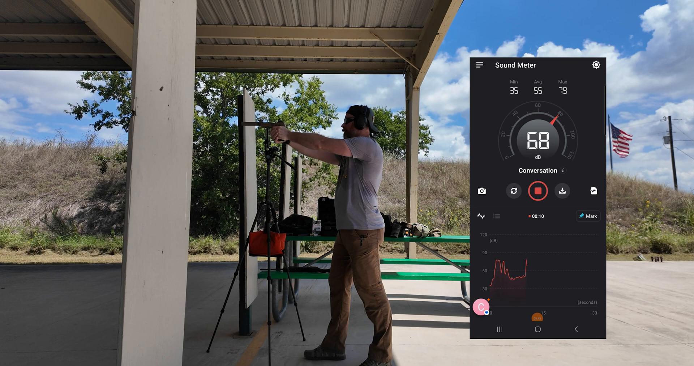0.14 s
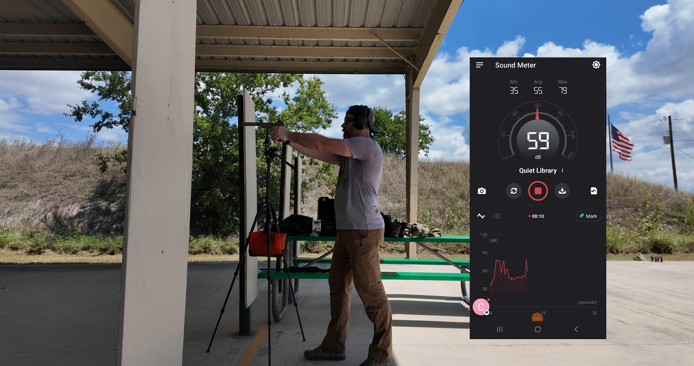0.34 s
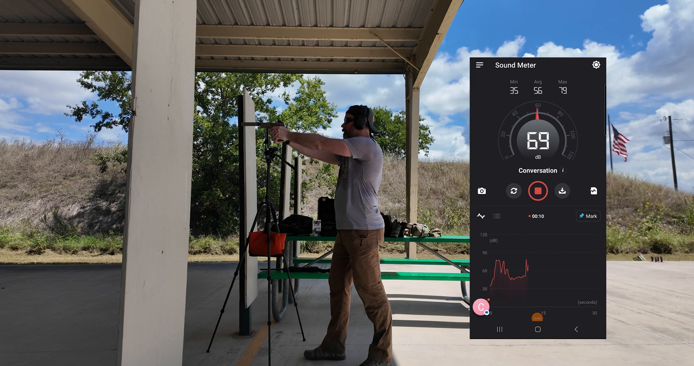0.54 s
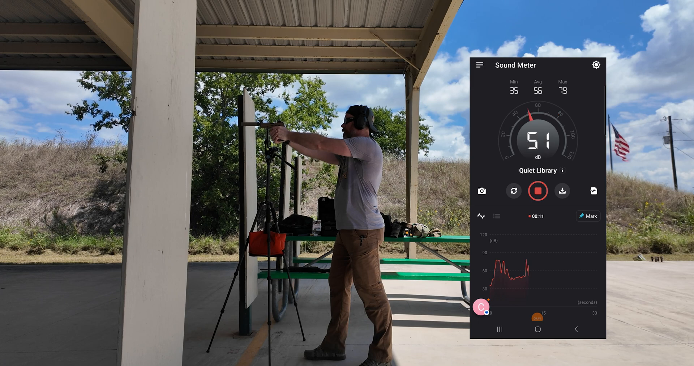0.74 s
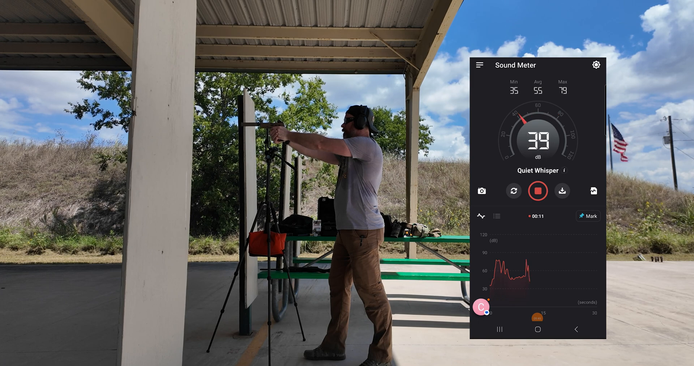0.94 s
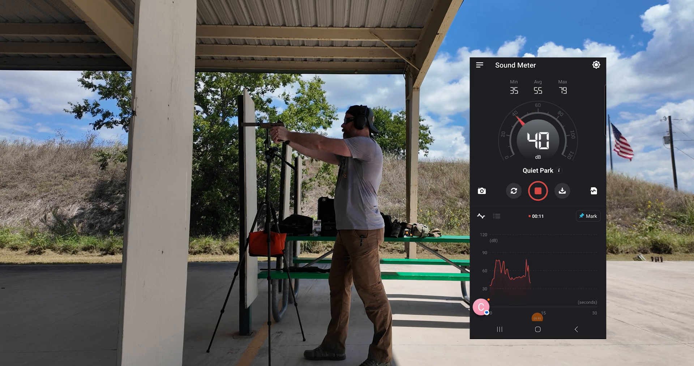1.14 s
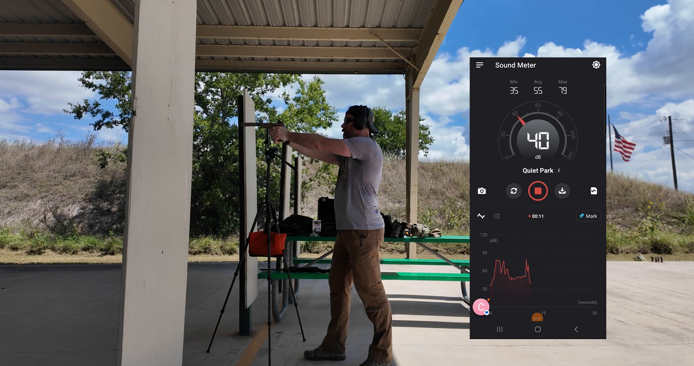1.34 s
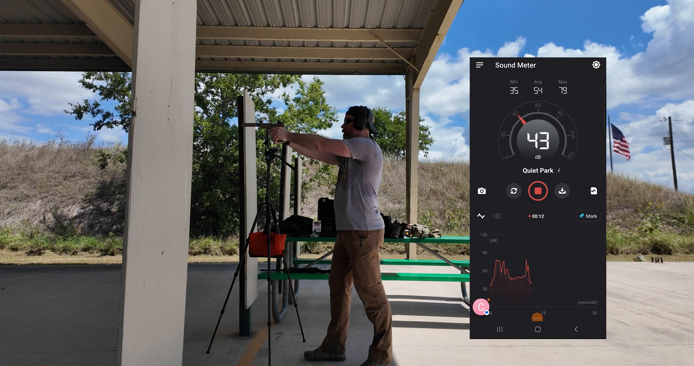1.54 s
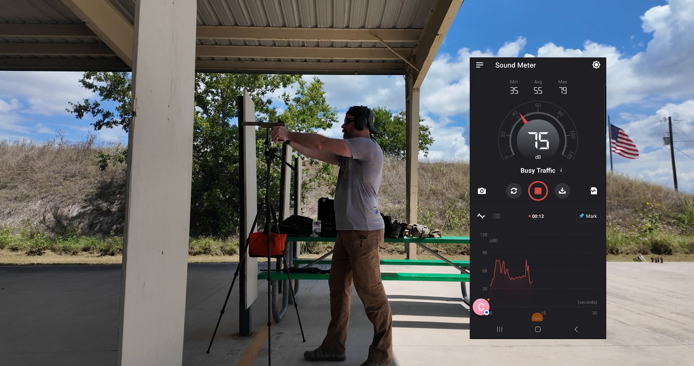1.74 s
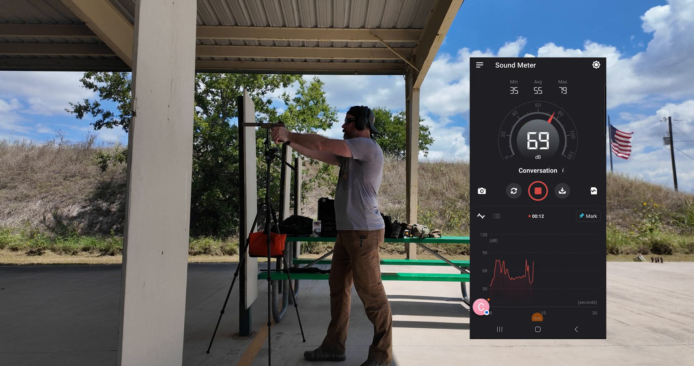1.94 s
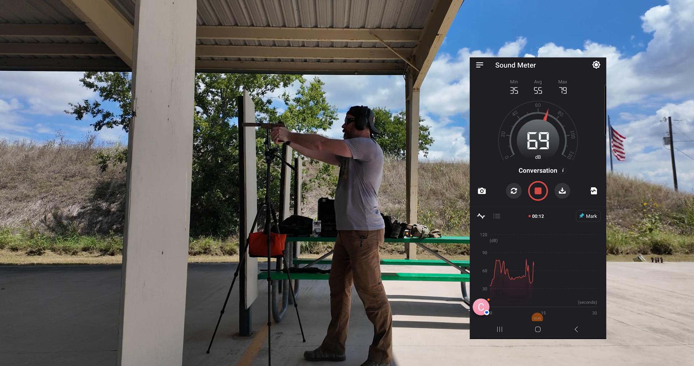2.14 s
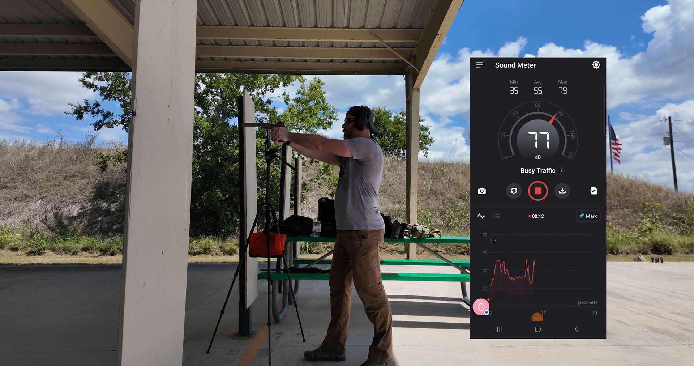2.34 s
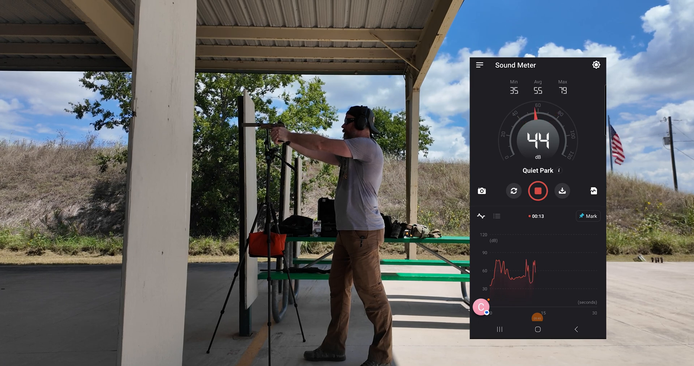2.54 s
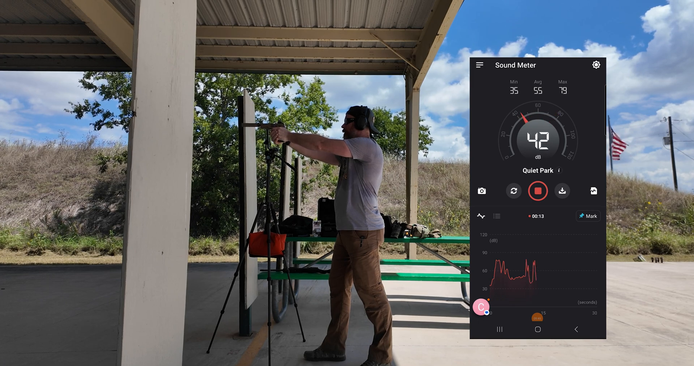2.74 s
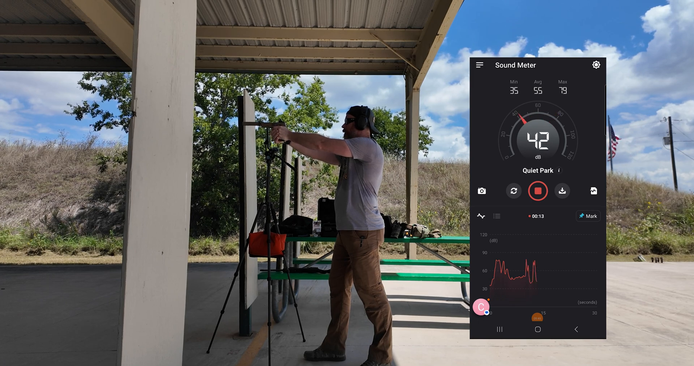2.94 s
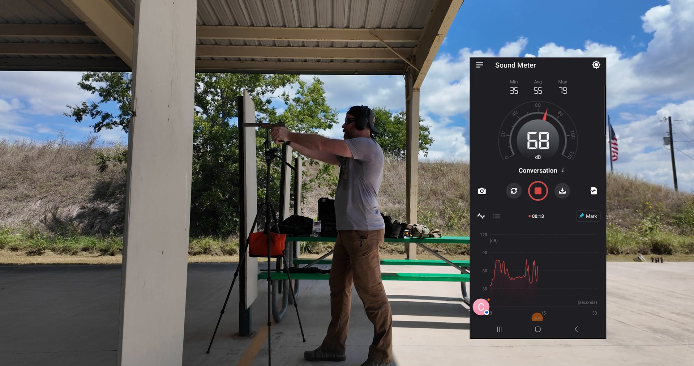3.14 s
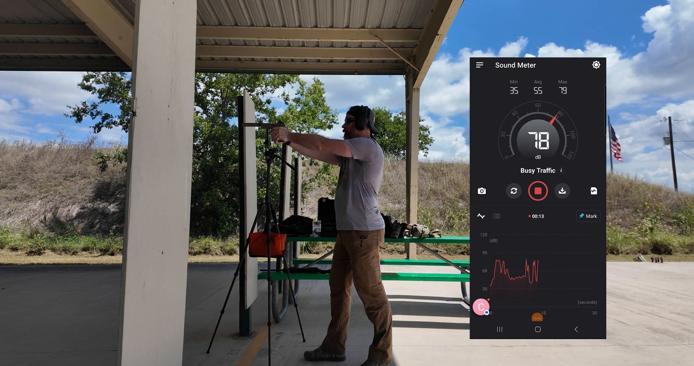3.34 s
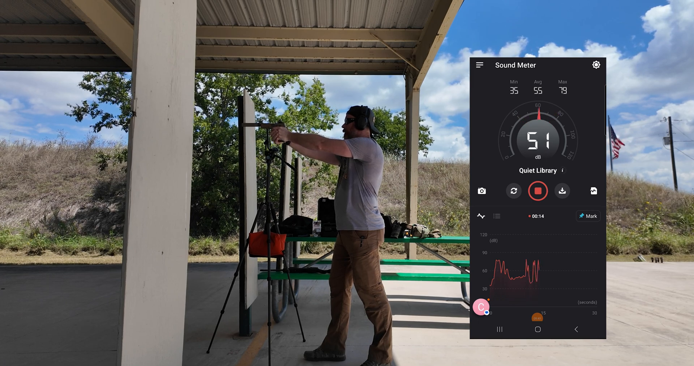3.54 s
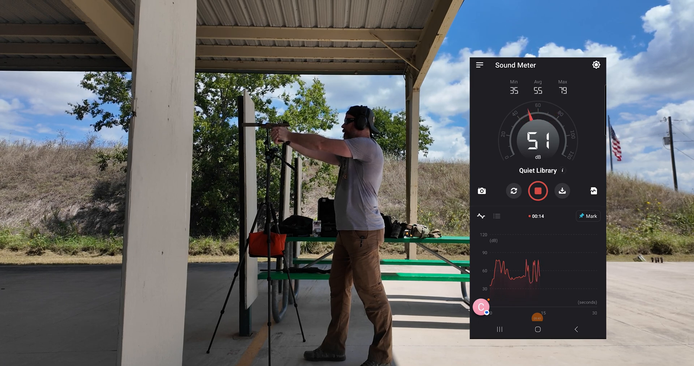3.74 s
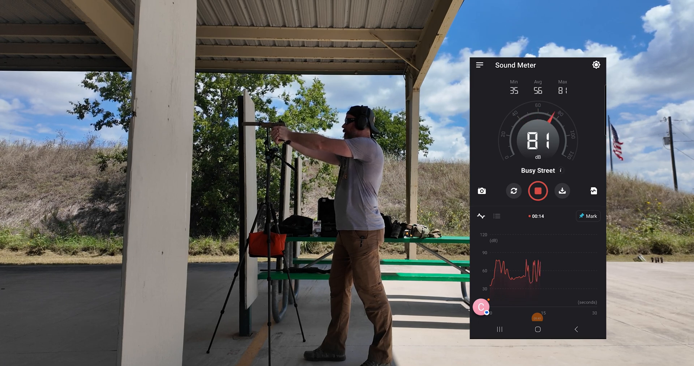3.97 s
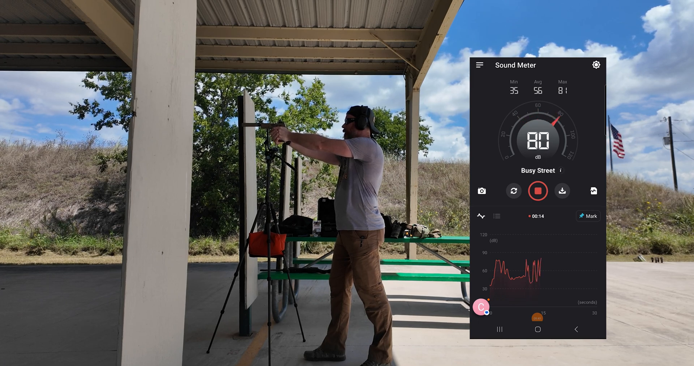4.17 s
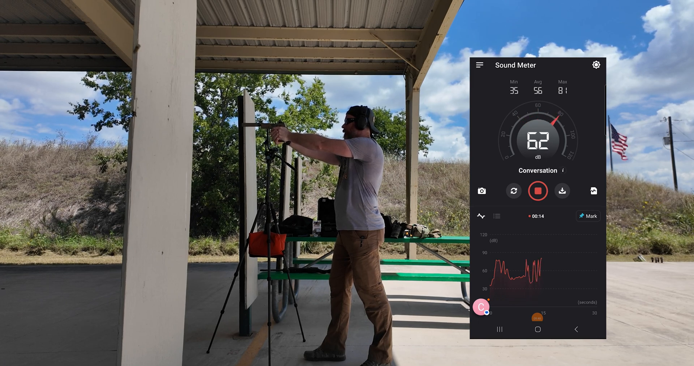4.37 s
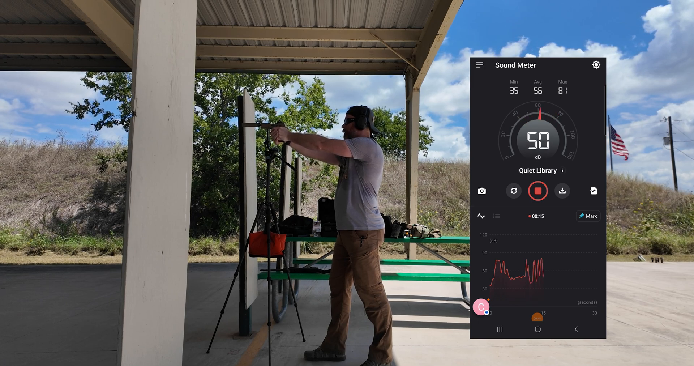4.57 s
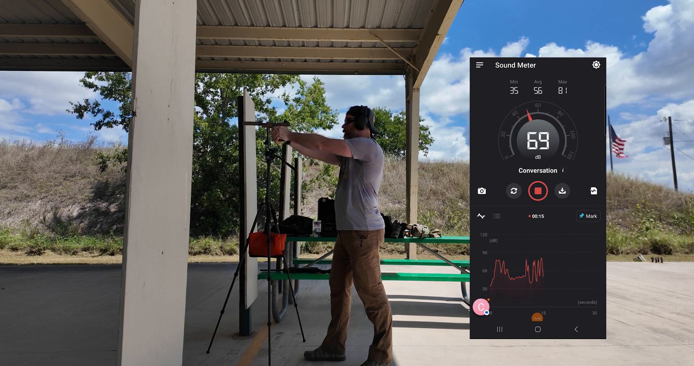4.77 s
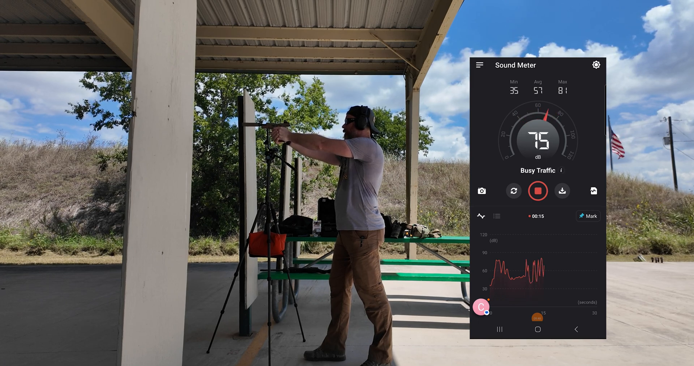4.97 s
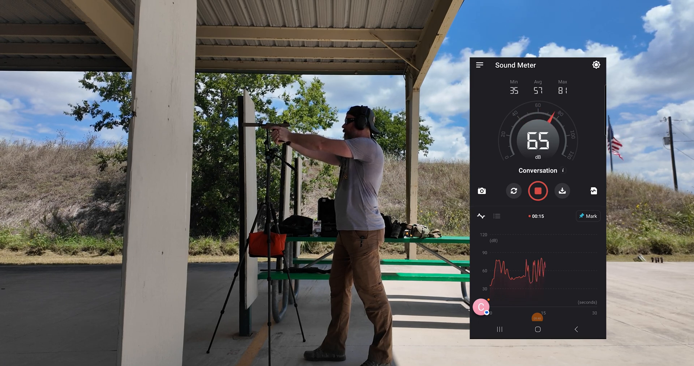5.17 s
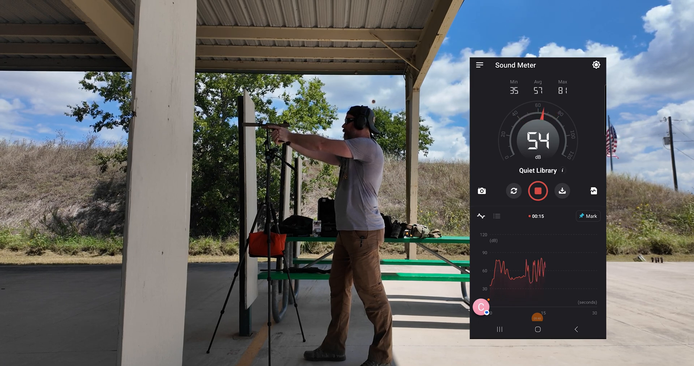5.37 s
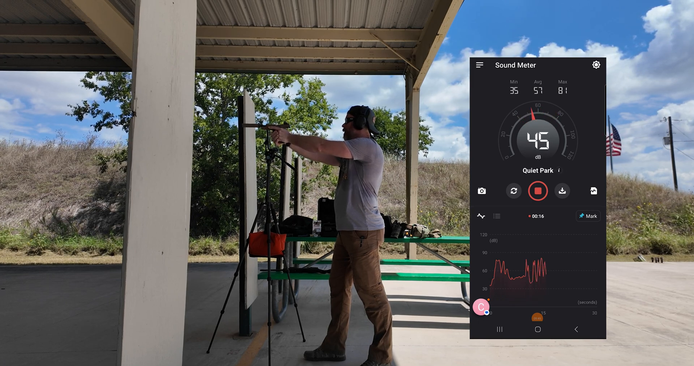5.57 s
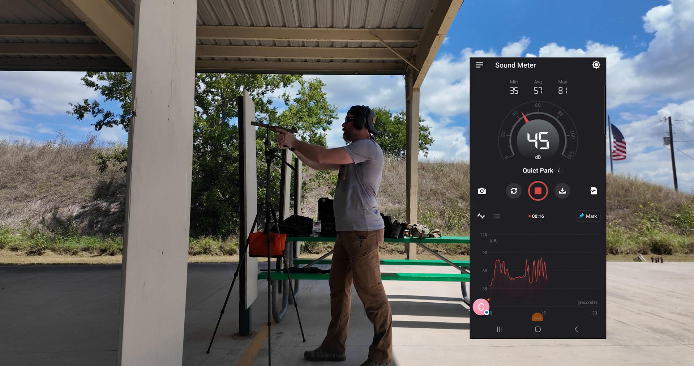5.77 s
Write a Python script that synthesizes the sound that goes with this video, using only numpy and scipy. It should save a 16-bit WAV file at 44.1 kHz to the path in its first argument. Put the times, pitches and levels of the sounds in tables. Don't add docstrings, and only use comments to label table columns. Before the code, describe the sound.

A roofed outdoor range, heard close with a gain control that ducks and recovers. From 0 s the diffuse wash of an earlier shot swells and dies; a spent case knocks hard and dry on a bench at 0.37 s, and faint brass ticks follow until 1.5 s. Suppressed small-pistol shots come at 1.73, 2.87, 3.85 and 4.76 s: a tiny trigger click, a short muzzle pop with gas spit, and rapid steel slide clacks, with little bass. About 0.15 s later a crisp clustered echo returns from the bank, then scattered wash blooms and fades with a faint roof ring. The middle two have sharper gas; the last locks open with a louder echo. Cases knock at 2.11, 3.23 and 4.12 s, the third higher, with thin pings and a faint skid on concrete. Soft wind, far traffic and a low drone lie beneath. At 5.66 s sheet metal clangs brightly, ringing to the end.

```python
import sys
import numpy as np
from scipy import signal
from scipy.fft import rfft, irfft
from scipy.io import wavfile
from scipy.ndimage import uniform_filter1d

SR = 44100
rng = np.random.default_rng(int(sys.argv[2]) if len(sys.argv) > 2 else 0)


def volts(x):
    e = np.asarray(x, float) / 20
    return 10 ** e


def generate_wav(signal):
    frames = np.transpose(np.atleast_2d(signal))
    scaled = np.clip(frames, -1, 1) * 32767
    pcm = np.round(scaled).astype(np.int16)
    wavfile.write(sys.argv[1], SR, pcm)


N = 255912
T = np.arange(N) / SR

# time in seconds, muzzle thump in dB, wash in dB, gain cut in dB.
SHOTS = [
    (-.3, -12, -7, 40),
    (1.7255, -11, -8, 40),
    (2.8742, -11, -8, 40),
    (3.8495, -11, -8, 40),
    (4.7557, -10, -7.5, 36),
]
# trigger lead in seconds, gas jet in dB, case ejection in dB,
# echo delay in seconds, echo in dB.
ROUNDS = [
    (.0333, -10, -20, .1476, -10),
    (.0254, -4, -17, .1454, -12),
    (.028, -3, -14, .1474, -10),
    (.0197, -11, -24, .151, -7),
]
# time in seconds, level in dB, rise in seconds, t60 in seconds.
CLANG = (5.6645, -18, .003, .7)


def unit(x):
    return x / np.sqrt(np.mean(x ** 2) + 1e-20)


def along(points, hz):
    f, v = np.transpose(points)
    return np.interp(np.log(hz + 1), np.log(f + 1), v)


def causal(x, spectrum):
    gain = volts(along(spectrum, np.fft.rfftfreq(8192, 1 / SR)))
    cepstrum = irfft(np.log(gain + 1e-5))
    cepstrum[1:4096] *= 2
    cepstrum[4097:] = 0
    impulse = irfft(np.exp(rfft(cepstrum)))
    return signal.fftconvolve(x, impulse)[:len(x)]


def patchy(level_db, patchy_db):
    hz, t, z = signal.stft(rng.standard_normal(N), SR, nperseg=512)
    field = uniform_filter1d(rng.standard_normal(z.shape), size=6, axis=0)
    field = uniform_filter1d(field, size=6, axis=1)
    gain = volts(level_db(hz[:, None], t) + patchy_db * unit(field))
    return signal.istft(z * gain, SR, nperseg=512)[1][:N]


def ring(modes, t, spread_db, attack):
    hz, db, t60 = np.transpose(modes)[..., None]
    luck = rng.standard_normal((2, len(modes), 1))
    sign = (-1) ** np.arange(len(modes))[:, None]
    decay = volts(db + spread_db * luck[0] - 60 * t / t60)
    detune = 1 + .008 * spread_db * luck[1]
    modes_sum = np.sum(sign * decay * np.sin(2 * np.pi * hz * detune * t), 0)
    return modes_sum * (1 - np.exp(-t / attack))


def add(track, s, sound):
    part = track[round(s * SR):][:len(sound)]
    part += sound[:len(part)]


def room(x, t60, wet_db):
    t = np.arange(SR // 4) / SR
    tail = rng.standard_normal(len(t)) * volts(-60 * t / t60) * (1 - np.exp(-t / .006))
    tail /= np.linalg.norm(tail)
    return x + volts(wet_db) * signal.fftconvolve(x, tail)[:N]


def air():
    # frequency in Hz, density in dB per Hz.
    breeze = [(20, -32), (50, -12), (80, -4), (120, -1), (180, -5), (250, -2), (500, -3), (790, -4),
              (1000, -9), (1600, -15), (3200, -16), (4200, -22), (5500, -22), (8000, -27), (12600, -34),
              (13200, -46)]
    # frequency in Hz, level in dB, start in seconds, end in seconds.
    machinery = [
        (239, -76, 0, 5.8),
        (1240, -76, 2.66, 2.87),
        (1240, -77, 5.52, 5.67),
    ]
    wind = volts(-67) * unit(causal(patchy(lambda hz, t: 0 * (hz + t), patchy_db=1.6), breeze))
    for hz, db, start, end in machinery:
        fade = np.clip((T - start) / .05 + .1, 0, 1) * (T < end)
        wind += volts(db) * np.sin(2 * np.pi * hz * T) * fade
    return wind


def wash():
    # frequency in Hz, density in dB per Hz.
    colour = [(18, -56), (30, -30), (118, -11), (176, -13), (409, -5), (593, -6), (1340, -3), (1490, -5),
              (2470, 0), (3970, -3), (6720, -2), (9480, -8), (12700, -23), (15200, -33), (16500, -63)]
    # frequency in Hz, t60 in seconds.
    decay = [(60, .5), (150, .46), (300, .58), (700, .8), (1300, .55), (2800, .54), (6000, .48),
             (10000, .4), (14000, .36)]
    # frequency in Hz, dB before the echo arrives.
    shade = [(2500, 0), (6000, -2), (10000, -6)]
    # frequency in Hz, width in Hz, level in dB.
    resonances = [(435, 14, 0), (760, 25, -2), (2900, 900, -13)]
    far_db, far_slower = -29, 2.2

    def level_db(hz, t):
        t60 = along(decay, hz)
        power = 0
        for s, _, db, _ in SHOTS:
            age = np.maximum(t - s, 0)
            near = db - 60 * (age - .25) / t60 + (age < .147) * along(shade, hz)
            far = db + far_db - 60 * (age - .25) / (far_slower * t60)
            power = power + (t > s + .008) * volts(2 * near) + (t > s + .15) * volts(2 * far)
        return 10 * np.log10(power + 1e-20) - 7.4

    plain = causal(patchy(level_db, patchy_db=1.5), colour)
    hz = np.fft.rfftfreq(N, 1 / SR)
    lift = 1
    for centre, width, db in resonances:
        damping = 1j * hz * width
        lift = lift + volts(db) * damping / (centre * centre - hz * hz + damping)
    return irfft(rfft(plain) * lift, N)


def roofing():
    # frequency in Hz, level in dB, t60 in seconds.
    sheets = [(435, -34, 1), (750, -37, 1.05), (860, -40, 1), (1655, -40, 1)]
    out, t = np.zeros(N + SR), np.arange(SR) / SR
    for s, *_ in SHOTS:
        waver = volts(2.5 * unit(uniform_filter1d(rng.standard_normal(len(t)), size=4000)))
        add(out, s + .5, waver * ring(sheets, t, spread_db=.8, attack=.03))
    return out[SR // 2:][:N]


def clang():
    # frequency in Hz, density in dB per Hz.
    sheet = [(59, -72), (100, -42), (360, -26), (466, -10), (761, -16), (1270, 0), (1950, -6), (2120, -1),
             (2990, -10), (3700, -4), (4290, -12), (4990, -9), (12500, -24), (15500, -35), (16500, -67)]
    # frequency in Hz, level in dB, t60 in seconds.
    panel = [(458, -13, 1.5), (549, -13, 1.5), (1030, -4, .3), (1105, -3, .3), (1190, -4, .25),
             (1297, -2, .2), (1370, -3, .3), (2135, -10, .8), (2272, -7, .54), (3671, -8, .6),
             (5112, -4, .25)]
    s, db, rise, t60 = CLANG
    t = np.arange(N - round(s * SR)) / SR
    luck = rng.uniform(size=(3, 1200, 1))
    place = (np.arange(1200)[:, None] + luck[0]) / 1200
    hz = 60 * (16000 / 60) ** (place ** .45)
    life = t60 * (hz / 2000) ** -.3 * (.3 + luck[1])
    level = along(sheet, hz) + 14 * np.log10(hz / 2000)
    dense = volts(level - 60 * t / life) * np.sin(2 * np.pi * (hz * t + luck[2]))
    crowd = volts(-19) * dense.sum(0) * (1 - np.exp(-t / rise))
    out = np.zeros(N)
    add(out, s, volts(db) * (crowd + .6 * ring(panel, t, spread_db=.5, attack=rise)))
    return out


def cases():
    # time in seconds, peak in dB, pitch factor.
    landings = [
        (0.365, -6, 1.01),
        (2.111, -6, .98),
        (3.233, -5, .98),
        (4.124, -6, 1.07),
    ]
    # frequency in Hz, level in dB, t60 in seconds.
    bench = [(950, -17, .014), (1390, -12, .012), (1980, -2, .009), (2400, -10, .006), (3060, -3, .006),
             (3550, -7, .006), (6400, -25, .008), (8350, -28, .005), (12100, -50, .025)]
    # frequency in Hz, level in dB.
    slab = [(150, -30), (500, -6), (1500, 0), (3500, -1), (5000, -14), (9000, -18), (13000, -34)]
    # time in seconds, tick in dB, ring in dB.
    bounces = [(.563, -43, -70), (.579, -54, -80), (1.061, -52, -67), (1.21, -74, -70), (1.33, -68, -72),
               (1.51, -64, -76), (2.772, -50, -70), (2.789, -58, -80), (3.578, -54, -70), (3.765, -44, -64),
               (4.4394, -52, -66), (4.695, -62, -80)]
    # frequency in Hz, level in dB, t60 in seconds.
    brass = [(5600, -16, .3), (12300, -5, .2), (12400, 0, .2), (12520, -3, .2)]
    # time in seconds, level in dB, t60 in seconds.
    skid = (4.272, -62, .22)
    knocks, blows, ticks = np.zeros(N), np.zeros(N), np.zeros(N)
    t = np.arange(SR // 3) / SR

    for s, db, pitch in landings:
        add(knocks, s - .0002, volts(db - 27 - 60 * t / .01) * rng.standard_normal(len(t)))
        add(knocks, s + .0003, volts(db + 2) * ring(bench, pitch * t, spread_db=.6, attack=.0005))
        blows[round(s * SR)] = volts(db - .7)
    knocks = causal(knocks, [(60, -38), (600, 0), (12000, 0), (16000, -12)])
    blows = causal(blows, slab)
    scattered = room(blows, t60=.27, wet_db=0) - blows

    for s, tick_db, ring_db in bounces:
        grit = volts(-60 * t / .008) * rng.standard_normal(len(t))
        scratch = causal(grit, [(2500, -20), (5000, 0), (10000, -2), (15000, -12)])
        tick = ring([(5550, 0, .005), (8200, -12, .004)], t, spread_db=1.5, attack=.0003) + .2 * scratch
        tumble = volts(4 * unit(uniform_filter1d(rng.standard_normal(len(t)), size=400)))
        tube = tumble * ring(brass, t, spread_db=.4, attack=.002)
        add(ticks, s, volts(tick_db + 6) * tick + volts(ring_db - 8) * tube)

    s, db, t60 = skid
    scrape = causal(rng.standard_normal(len(t)), [(6000, -30), (9000, -6), (13000, 0)])
    add(ticks, s, volts(db - 60 * t / t60) * scrape)
    return knocks + scattered, room(ticks, t60=.45, wet_db=-3)


def bank():
    # frequency in Hz, density in dB per Hz.
    earth = [(290, -38), (500, -8), (2540, -5), (3540, -1), (4530, -4), (5550, -1), (9220, -6),
             (13100, -17), (16000, -29)]
    # extra delay in seconds, level in dB.
    ledges = [(0, 0), (.0048, -9), (.0092, -6)]
    out = np.zeros(N)
    for (s, *_), (*_, delay, db) in zip(SHOTS[1:], ROUNDS):
        for later, step_db in ledges:
            arrival = s + delay + later
            out[round((arrival + .0011) * SR)] += volts(db + step_db + 12.5)
            out[round((arrival + .00165) * SR)] += volts(db + step_db + 10.5)
    return causal(out, earth)


def contacts():
    # body in dB, bright in dB, t60 in seconds.
    trigger = (-48, -54, .01)
    # seconds after the shot, body in dB, bright in dB, t60 in seconds.
    firing = [
        (-.0031, -21, -50, .008),
        (0, -6, -22, .016),
        (.0019, -4, -16, .018),
        (.0115, -9, -15, .014),
    ]
    feeding = [
        (.0168, -21, -30, .01),
        (.0312, -5, -19, .02),
        (.0391, -18, -30, .02),
    ]
    locking = [(.0151, -18, -30, .012), (.0189, -16, -21, .022), (.0368, -26, -36, .01)]
    rows = []
    for (s, *_), (lead, jet_db, eject_db, *_) in zip(SHOTS[1:], ROUNDS):
        pull = (-lead, *trigger)
        jet = (.0049, -15, jet_db, .012)
        ejection = (.0217, -22, eject_db, .014)
        is_last = s == SHOTS[-1][0]
        cycle = [pull, jet, ejection] + firing + (locking if is_last else feeding)
        rows += [(s + later, *rest) for later, *rest in cycle]
    return rows


def pistol():
    # frequency in Hz, level in dB.
    body = [(1350, -14), (1750, -10), (2100, -8), (2450, -4), (2850, -1.5), (3300, -8), (3900, -17)]
    # frequency in Hz, level in dB.
    bright = [(5600, -6), (6500, -2), (7000, -3), (7900, -8), (9300, -6), (11500, -15)]
    out, t = np.zeros(N), np.arange(SR // 16) / SR
    for s, body_db, bright_db, t60 in contacts():
        frame = [(hz, db + body_db + 4.5, t60 * .7) for hz, db in body]
        slide = [(hz, db + bright_db - .7, t60 * .6) for hz, db in bright]
        low = ring(frame, t, spread_db=1.8, attack=.0006)
        high = ring(slide, t, spread_db=2.5, attack=.0003)
        spit = volts(bright_db - 9 - 60 * t / (t60 * .7)) * rng.standard_normal(len(t))
        add(out, s, low + high + causal(spit, [(1000, -6), (3000, 3), (9000, 4), (15000, -8)]))

    u = t / .0025
    push = volts(-34) * (1 - u) * np.exp(-u) * (1 - np.exp(-t / .001))
    gas = [(310, -10, .02), (130, -32, .04), (600, 2, .013), (980, -4, .011)]  # Hz, dB, t60 s
    for s, thump_db, *_ in SHOTS[1:]:
        thump = push + ring(gas, t, spread_db=1.2, attack=.0012)
        add(out, s + .001, volts(thump_db + 8) * thump)
    return room(out, t60=.11, wet_db=-16)


def gain_db():
    cuts = [(s, cut_db, .214) for s, _, _, cut_db in SHOTS] + [(CLANG[0], 12, .01)]
    total = np.zeros(N)
    for s, cut_db, slow in cuts:
        onset = np.clip((T - s + .013) / .011, 0, 1)
        total -= cut_db * onset * np.exp(-(np.maximum(T - s, 0) / slow) ** 1.58)
    return total


def scene():
    knocks, ticks = cases()
    hits = pistol() + bank() + knocks + clang()
    ambience = wash() + air() + ticks + roofing()
    return (hits + volts(gain_db()) * ambience)[None]


def top_cut(x):
    return signal.sosfilt(signal.butter(12, 16840, fs=SR, output="sos"), x)


def record(dry):
    # frequency in Hz, level in dB.
    mic = [(20, -28), (60, -11), (150, 0), (14000, 0), (15500, -3), (16200, -12), (17000, -50)]
    clipped = dry[0] / (1 + np.abs(dry[0] / .5) ** 6) ** (1 / 6)
    return top_cut(causal(clipped, mic)[None])


dry = scene()
out = record(dry)
generate_wav(out)
```